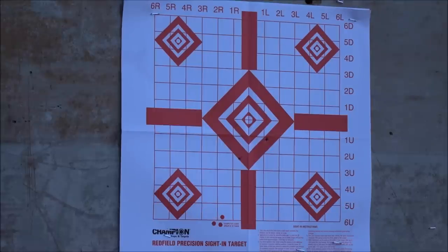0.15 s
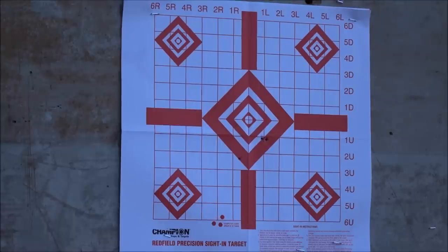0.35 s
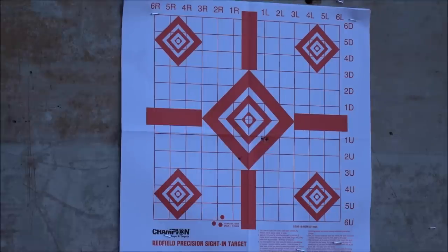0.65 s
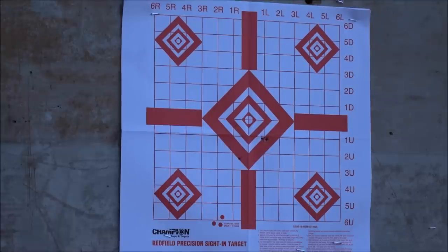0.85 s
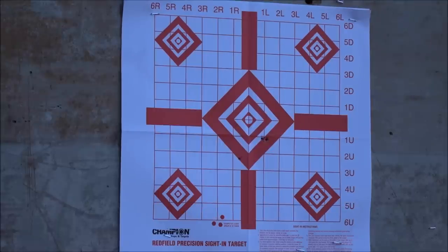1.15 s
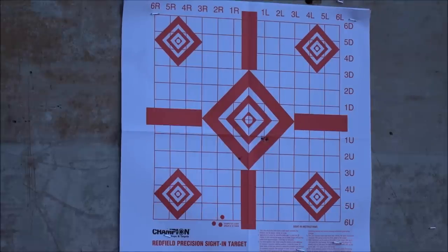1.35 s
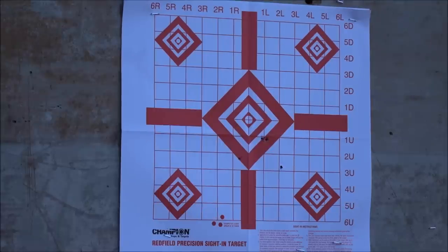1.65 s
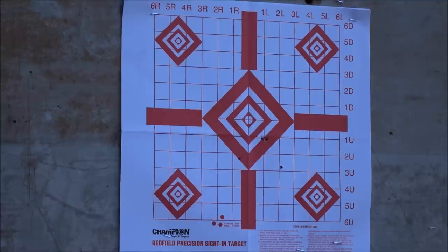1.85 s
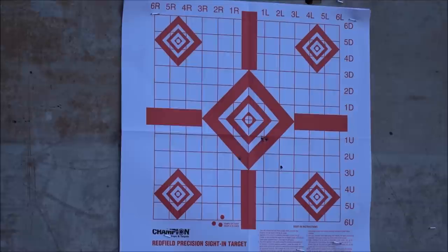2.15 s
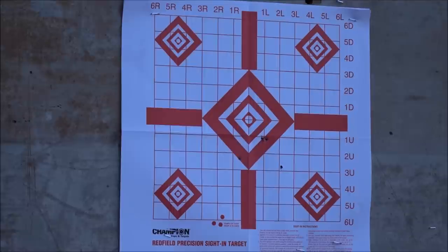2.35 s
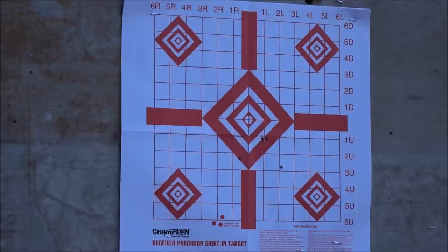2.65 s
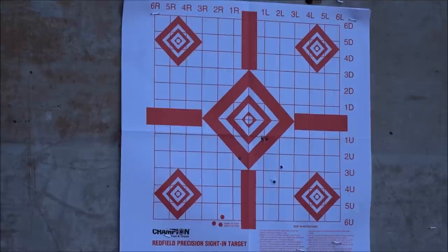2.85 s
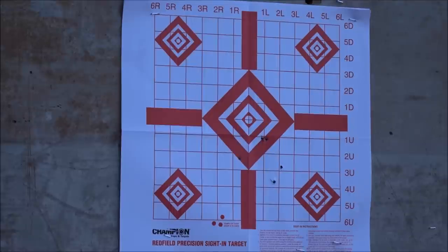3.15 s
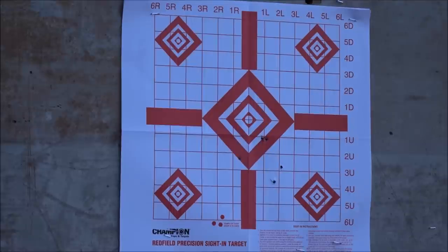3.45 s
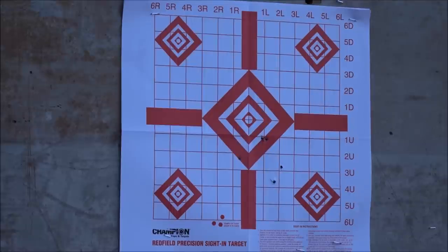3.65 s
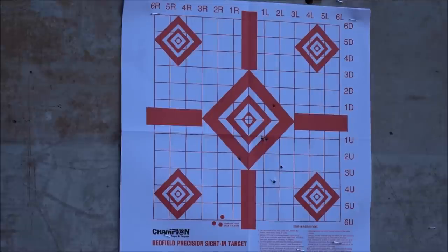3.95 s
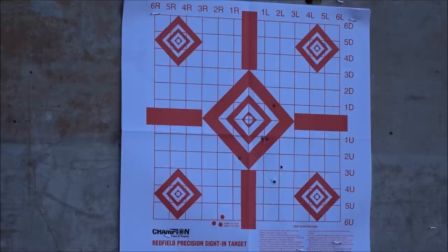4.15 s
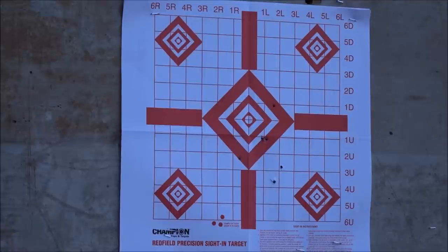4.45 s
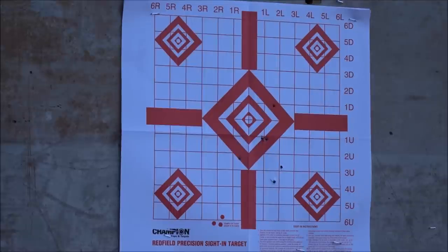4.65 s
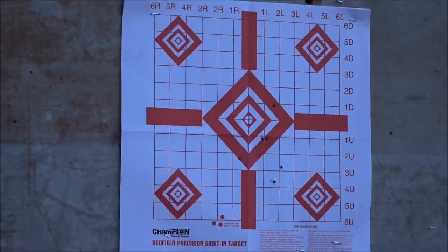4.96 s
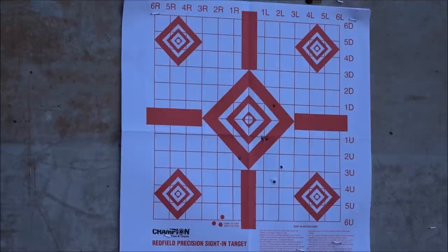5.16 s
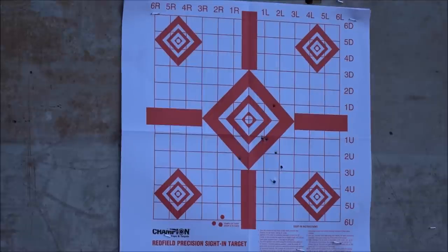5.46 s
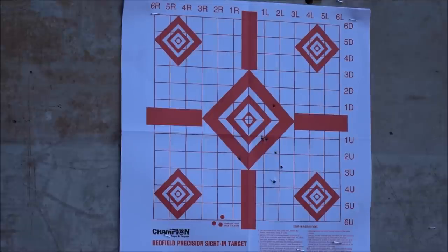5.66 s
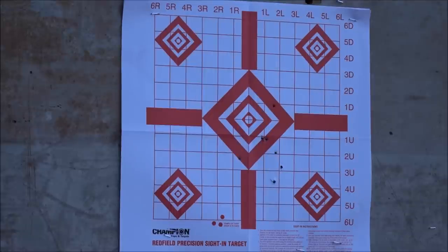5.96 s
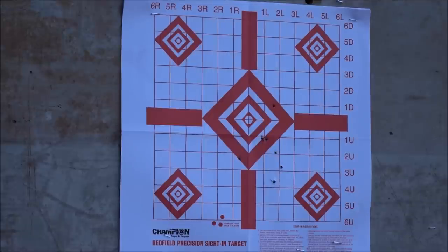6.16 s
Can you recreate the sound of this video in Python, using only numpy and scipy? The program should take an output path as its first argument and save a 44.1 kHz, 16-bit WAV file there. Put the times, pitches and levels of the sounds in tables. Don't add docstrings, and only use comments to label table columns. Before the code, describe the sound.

Six distant air rifle shots, each a clicking pop, then a pellet hiss and sharp slap on a target board, echoing through a humming outdoor yard.

```python
import sys
import numpy as np
from scipy import signal
from scipy.fft import rfft, irfft, next_fast_len
from scipy.io import wavfile
from scipy.ndimage import uniform_filter1d

SR = 44100
rng = np.random.default_rng(int(sys.argv[2]) if len(sys.argv) > 2 else 0)


def ratio_of_db(decibels):
    return 10 ** (np.asarray(decibels, float) / 20)


def transcribe(signal):
    frames = np.atleast_2d(signal).T
    limited = np.clip(frames, -1, 1)
    pcm = np.round(limited * 32767).astype(np.int16)
    wavfile.write(sys.argv[1], SR, pcm)


N = 277389
T = np.arange(N) / SR
SIDE = np.array([[1], [-1]])

# start_s, peak_db, barrel_ring_hz, first_knock_db
POPS = [(.2157, -18, 2870, -10), (1.5442, -18.5, 2700, -8), (2.702, -18.5, 3110, -.5),
        (3.8672, -17.5, 2900, -10), (5.143, -18.5, 2700, -8), (6.055, -18, 3170, -2)]
# start_s, peak_db, ring_hz, brightness_db_per_octave, fly_by_db
SLAPS = [(0.3666, -13, 4000, -0.6, -29.5), (1.7046, -14, 4470, 1.15, -27), (2.8839, -14.5, 3190, 0.75, -28),
         (4.017, -14, 3060, 0.33, -30), (5.3001, -14, 4670, 0.03, -28), (6.2336, -15, 2460, 1, -28)]
CHANGES = [1.09, 2.356, 3.49, 4.762, 5.795]


def band(x, hz, width_hz, order=2):
    low_hz = max(hz - width_hz / 2, 10)
    high_hz = min(hz + width_hz / 2, .45 * SR)
    return signal.sosfilt(signal.butter(order, [low_hz, high_hz], "band", fs=SR, output="sos"), x)


def unit(x):
    return x / np.sqrt(np.mean(x ** 2))


def pan(db):
    return ratio_of_db(np.array([db / 2, -db / 2]))


def add(out, x, s):
    start = int(s * SR)
    later = [int(change * SR) for change in CHANGES if change > s]
    end = min([N, start + x.shape[1]] + later)
    out[:, start:end] += x[:, :end - start]


def walk(rate_hz):
    hold = int(SR / rate_hz)
    steps = np.repeat(rng.standard_normal(N // hold + 1), hold)
    return 1.2 * uniform_filter1d(uniform_filter1d(steps, hold), hold)[:N]


def lumpy(size, hold, smooth):
    steps = rng.standard_normal(size // hold + 1).repeat(hold)[:size]
    return uniform_filter1d(steps, smooth)


def split(x, centres_hz):
    size = next_fast_len(x.shape[-1])
    spectrum = rfft(x, size)
    bins_hz = np.fft.rfftfreq(size, 1 / SR)
    place = np.interp(np.log(bins_hz + 1), np.log(centres_hz), np.arange(len(centres_hz)))
    for k, hz in enumerate(centres_hz):
        share = np.cos(np.pi / 2 * np.clip(place - k, -1, 1)) ** 2
        yield hz, irfft(spectrum * share, size)[..., :x.shape[-1]]


def per_take(table):
    row = np.searchsorted(np.transpose(table)[0][1:], T)
    start, *columns = np.array(table)[row].T
    return T - start, *columns


def ring(modes, ring_hz, jitter):
    t = T[:1024]
    y = 0
    for (ratio, db, t60), shift in zip(modes, jitter):
        hz = min(ratio * ring_hz * (1 + shift), 15000)
        y = y + ratio_of_db(db - 60 * t / t60) * np.sin(2 * np.pi * hz * t)
    y = y * np.minimum(t / .0003, 1)
    return y / np.abs(y).max()


def spray(size, grain_db):
    sizes = np.minimum(rng.exponential(size=(2, size // 8 + 1)), 3.5)
    grains = ratio_of_db(grain_db * sizes).repeat(8, axis=1)[:, :size]
    return unit(rng.standard_normal((2, size)) * grains)


def scatter(profile, colour, same, grain_db, wide_hz, tilt_db=0):
    delay, db, side_db = np.transpose(profile)
    t = delay[0] + T[:same.shape[1]]
    lows = signal.butter(4, 1300, fs=SR, output="sos")
    fresh = spray(len(t), grain_db)
    echoes = fresh + signal.sosfiltfilt(lows, same - fresh)
    hz_at, tone_db, loss_db = np.transpose(colour)
    centres_hz = hz_at[0] * 2 ** np.arange(0, np.log2(17000 / hz_at[0]), .5)
    out = 0
    for hz, (mid, side) in split(echoes, centres_hz):
        gain_db = np.interp(np.log(hz), np.log(hz_at), tone_db) - 10 * np.log10(hz / SR)
        gain_db = gain_db + tilt_db * np.log2(hz / 3000)
        gain_db = gain_db + (.7 + 4.5 * np.clip(t, 0, .5)) * lumpy(len(t), 500, 400)
        gain_db = gain_db - 9 * np.exp(-(t / 0.0094) ** 2) * (hz > 7000)
        gain_db = gain_db - t * np.interp(np.log(hz), np.log(hz_at), loss_db)
        width = np.clip((hz / wide_hz) ** 0.67, .3, 1) * min(1, (9000 / hz) ** .6)
        out = out + ratio_of_db(gain_db) * (mid + width * side * SIDE)
    return out * ratio_of_db(np.interp(t, delay, db) - 11) * pan(np.interp(t, delay, side_db))


def buzz(resonances):
    total = 0
    for hz, width_hz, db in resonances:
        wings = unit(band(rng.standard_normal((2, N)), hz, width_hz))
        total = total + ratio_of_db(db + 0.79 * walk(3.8) + 1.5 * walk(60)) * wings
    return unit(total)


def air():
    # pitch_hz, level_db_per_hz
    air_colour = [(15, -22), (25, -17), (43, -20.5), (70, -9.5), (102, -8), (217, -18.5), (463, -26),
                  (962, -18.5), (1130, -19), (1400, -21.5), (2160, -22.5), (3160, -30.5), (5730, -43),
                  (9320, -59.5), (16000, -63.5)]
    hz_at, db_at = np.transpose(air_colour)
    total = 0
    for hz, (mid, side) in split(rng.standard_normal((2, N)), 18 * 2 ** np.arange(0, 10, .5)):
        db = np.interp(np.log(hz), np.log(hz_at), db_at) + 2.6 * walk(7.8)
        total = total + ratio_of_db(db) * (mid + np.clip(hz / 2000, .14, 1) * side * SIDE)
    return total / np.std(band(total[0], 1400, 2300))


def yard():
    # start_s, air_db, air_drift_db_per_s, near_insects_db, far_insects_db
    surroundings = [(0, -59.5, -0.5, -72.5, -95), (1.09, -61.5, 3, -72, -94.5),
                    (2.37, -60.5, 3, -81.5, -81), (3.49, -58, -0.1, -87, -69.5),
                    (4.78, -61, 5.5, -100, -100), (5.8, -54, 2.5, -100, -100)]
    # pitch_hz, width_hz, level_db
    near_insects = [(8400, 350, -3.5), (9230, 390, 2), (9840, 400, -7), (9300, 2050, -1.5)]
    # pitch_hz, width_hz, level_db
    far_insects = [(7750, 300, -5.5), (8100, 250, -5), (8700, 300, -6), (9170, 340, 0.5)]
    since, air_db, drift_db, near_db, far_db = per_take(surroundings)
    rustle_s = 2.39
    rustle_db = np.where(T > rustle_s, -234 * (T - rustle_s), -100)
    near_db = np.maximum(near_db, -62 + rustle_db)
    far_db = np.maximum(far_db, -70.5 + rustle_db)
    hiss_db = np.maximum(-81.5, -66 + rustle_db)
    hiss = unit(band(rng.standard_normal((2, N)), 11000, 11000))
    tyres = unit(band(rng.standard_normal(N), 1345, 451.5))
    tyres = (T < 0.34) * ratio_of_db(-60.5 + 2.1 * walk(5)) * tyres
    insects = ratio_of_db(near_db) * buzz(near_insects) + ratio_of_db(far_db) * buzz(far_insects)
    return tyres + ratio_of_db(air_db + drift_db * since) * air() + insects + ratio_of_db(hiss_db) * hiss


def drone(hz, db, wobble_db, swell_db):
    turns = np.cumsum(hz * (1 + .012 * walk(14))) / SR
    level_db = db + wobble_db * walk(28) + swell_db * walk(7)
    return np.sqrt(2) * ratio_of_db(level_db) * np.sin(2 * np.pi * turns)


def duck_db():
    dip_db, dip_at_s, dip_s = -10.5, .035, 0.08
    sag_db, recover_s = -5.5, 1
    since = T - np.transpose(SLAPS)[0][:, None]
    ends = [min([change for change in CHANGES if change > s] + [N / SR]) for s, *_ in SLAPS]
    sag = (since > 0) * (T < np.array(ends)[:, None]) * np.exp(-np.abs(since) / recover_s)
    dip = np.exp(-((since - dip_at_s) / dip_s) ** 2)
    return (dip_db * dip + sag_db * sag).sum(axis=0)


def engines():
    # start_s, firing_hz, glide_hz_per_s, first_line_db, second_line_db
    firing = [(0, 51.8, 0.5, -60.5, -58.5), (1.09, 52.1, 0, -59.5, -64), (2.37, 52.0, 1, -59.5, -60),
              (3.49, 52.64, 0, -53.5, -55.5), (4.78, 51.77, -1.44, -58.5, -49), (5.8, 49.1, 8, -57, -51)]
    # start_s, end_s, pitch_hz, level_db
    machines = [(0, 1.0, 139.8, -70), (1.08, 1.3, 119.4, -58.5), (1.318, 2.36, 121, -65),
                (2.391, 3.481, 144, -63), (3.0, 3.49, 85.7, -66), (3.488, 4.76, 121.7, -69.5),
                (3.49, 4.202, 169.3, -68), (4.791, 6.281, 149.8, -63), (5.801, 6.286, 123.4, -62.5)]
    since, hz, glide, low_db, high_db = per_take(firing)
    hz = hz + glide * since
    out = drone(hz, low_db, wobble_db=2.0, swell_db=1.0)
    out = out + drone(2 * hz, high_db, wobble_db=3.0, swell_db=0.5)
    out = out * ratio_of_db(uniform_filter1d(duck_db(), 400))
    for start, end, hz, db in machines:
        on_db = np.interp(T, [start - .02, start, end, end + .02], [-100, db, db, -100])
        out = out + drone(hz, on_db, wobble_db=4.0, swell_db=-1.1)
    return out


def small_sounds():
    # start_s, length_s, from_hz, to_hz, level_db
    chirps = [
        (2.335, .02, 4800, 4600, -74),
        (3.75, .04, 5300, 4800, -77),
        (4.81, .045, 5300, 3200, -71),
        (4.878, .022, 6100, 4200, -72),
        (4.898, .025, 5700, 3600, -72),
        (4.915, .025, 5700, 4200, -74),
        (5.036, .034, 6100, 3600, -70),
        (5.063, .02, 5500, 3800, -71),
        (5.08, .03, 5200, 3600, -73),
    ]
    # start_s, peak_db
    ticks = [
        (3.4617, -34),
        (5.883, -47),
    ]
    out = np.zeros((2, N))
    for s, length, from_hz, to_hz, db in chirps:
        u = T[:int(length * SR)] / length
        turns = np.cumsum(from_hz + (to_hz - from_hz) * u) / SR
        tone = np.sin(2 * np.pi * turns) * np.sin(np.pi * u)
        leaves = rng.standard_normal((2, 1600)) * np.exp(-T[:1600] / .014) * .075
        blurred = signal.fftconvolve(leaves, tone[None])
        add(out, ratio_of_db(db) * (blurred + .6 * np.pad(tone, (0, 1599))), s)
    u = T[:64] / .00009 - 4
    snap = (u ** 2 - 1) * np.exp(-u ** 2 / 2)
    for s, db in ticks:
        add(out, ratio_of_db(db) * np.outer(pan(2.8), snap), s)
    return out


def rifle():
    # delay_s, level_db, left_minus_right_db
    pop_parts = [
        (-.0056, -16, 0),
        (.0002, 1.5, -4),
        (.008, -18, 2),
        (.0146, -9, 3),
        (.024, -16, 2),
        (.0372, -11, -4),
        (.049, -17, 0),
        (.062, -18, 0),
        (.074, -21, 0),
    ]
    # ratio_to_ring, level_db, t60_s
    pop_modes = [(.42, -11.5, 0.0095), (.75, -10, 0.0025), (1, 13, 0.003), (1.35, 1.5, 0.001),
                 (2.05, -5, 0.0031), (3.2, -17.5, 0.0026), (4.6, -13, 0.0016)]
    # delay_s, level_db, left_minus_right_db
    pop_echo = [(-.006, -36, -7.5), (.004, -12, 0), (.04, -14, -2), (.08, -18.5, 2.5), (.2, -24.5, -16),
                (0.299, -31.5, -4.5)]
    # pitch_hz, level_db, loss_db_per_s
    pop_colour = [(68, -45.5, 53.5), (165, -7, 53.5), (410, -27.5, 22.5), (990, -12.5, 2), (2040, -9, 1),
                  (3150, -1, 42.5), (4470, -8, -31.5), (7000, -11.5, -33.5), (9800, -12, -39.5),
                  (15070, -24.5, -38)]
    out = np.zeros((2, N))
    same = spray(int(.3 * SR), 0.87)
    for s, db, ring_hz, first_db in POPS:
        for delay, part_db, side_db in pop_parts:
            for lag, knock_db in ((0, first_db), (.0015, 0)):
                knock = ring(pop_modes, ring_hz, 0.018 * rng.standard_normal(len(pop_modes)))
                add(out, ratio_of_db(db + part_db + knock_db) * np.outer(pan(side_db), knock), s + delay + lag)
        echoes = scatter(pop_echo, pop_colour, same, grain_db=1.0, wide_hz=4000)
        barrel = ratio_of_db(5 + .8 * first_db) * band(echoes, ring_hz, 220, order=1)
        add(out, ratio_of_db(db) * (echoes + barrel), s + pop_echo[0][0])
    return out


def pellet():
    # pitch_hz, level_db
    wake_colour = [(1500, -17), (4000, -16), (7000, -4.5), (10000, -4.5), (13000, 4.5), (16000, -5),
                   (21000, -17.5)]
    out = np.zeros((2, N))
    t = T[:int(.2 * SR)] - .15
    hz_at, db_at = np.transpose(wake_colour)
    shift = 1 - 0.15 * np.exp(-((t - .003) / 0.0066) ** 2)
    for (s, _, _, tilt_db, hiss_db), (fired_s, *_) in zip(SLAPS, POPS):
        lead = .158 * (s - fired_s)
        flutter_db = -41.5 - 3.5 * tilt_db
        near = 1 / np.sqrt(1 + (t / np.where(t < 0, .011, .008)) ** 2)
        back = ratio_of_db(-5.5) * np.exp(-((t - lead + 0.0062) / .004) ** 2)
        eddies = ratio_of_db(2.6 * lumpy(len(t), 40, 30))
        wake = 0
        for hz, part in split(spray(len(t), 2.0), np.arange(1, 13) * 1400.):
            wake = wake + ratio_of_db(np.interp(hz / shift, hz_at, db_at)) * part
        wake = unit(eddies * (wake[0] + 0.75 * wake[1] * SIDE))
        tumble = unit(uniform_filter1d(rng.standard_normal(len(t)), 150))
        hz = (400 - 220 * np.tanh((t - .002) / .014)) * (1 + 0.11 * tumble)
        flutter = np.sin(2 * np.pi * np.cumsum(hz) / SR) * np.exp(-np.abs((t - .004) / 0.01) ** 1.1)
        fade = np.clip((t + .15) / .05, 0, 1) * np.clip((lead - t) / .004, .1, 1) * (t < lead + .01)
        sweep = pan(-3 * np.exp(-(t / .015) ** 2))
        passing = ratio_of_db(hiss_db) * (near ** 1.59 + back) * wake + ratio_of_db(flutter_db) * flutter
        add(out, fade * sweep * passing, s - lead - .15)
    return out


def reflectors():
    # delay_s, depth_s, level_db, fade_db_per_s, left_minus_right_db
    surfaces = [
        (0, 0.0013, -1, 1400, 0),
        (.01, .04, -4, 167, 3),
        (0.078, .02, -6.5, 155, 1.5),
        (0.216, 0.016, -19.5, 300, -2.5),
        (0.244, 0.044, -20.5, 84, -2),
        (0.4213, 0.0022, -26, 107, 0.5),
        (0.672, 0.047, -37, 303, 2.5),
    ]
    t = np.arange(0, 1, .0005)
    delay, depth, db, fade_db, side_db = np.transpose(surfaces)[:, :, None]
    swell_db = 20 * np.minimum(t - delay, 0) / np.minimum(2.7 * depth, delay + 0.0011)
    power = ratio_of_db(db + swell_db - fade_db * np.maximum(t - delay - depth, 0)) ** 2
    total = power.sum(axis=0) + ratio_of_db(-57.5) ** 2
    return np.transpose([t, 10 * np.log10(total), (power * side_db).sum(axis=0) / total])


def board():
    # delay_s, level_db, left_minus_right_db
    slap_parts = [
        (.0006, 3, 1.5),
        (.003, -5, 3),
        (.4228, -23.5, -5),
        (.695, -37, 3),
    ]
    # ratio_to_ring, level_db, t60_s
    slap_modes = [(.3, -8, 0.0069), (.6, 2.5, 0.0072), (1, 3.5, 0.0069), (1.6, 1.5, 0.0033),
                  (2.5, -2, 0.0038), (3.4, -7.5, 0.005)]
    # delay_s, pitch_hz, level_db, length_s
    booms = [(.01, 930, -25, .007), (.009, 550, -29, .006), (.023, 605, -25, .007), (.033, 430, -25, .01),
             (.044, 365, -29, .009), (.066, 410, -31, .007), (.078, 1030, -28, .009), (.07, 198, -43, .03),
             (.1, 80, -37, .05)]
    # pitch_hz, level_db, loss_db_per_s
    slap_colour = [(76.4, -56.5, 20), (150, -40.5, 15.5), (248.5, -33.5, 29), (425.6, -20, 32.5),
                   (770, -22, 7), (1130, -10, -5), (2100, -5, -6), (3150, 0.5, 6), (4760, 0.5, 16.5),
                   (7200, -4.5, 34), (10840, -10.5, 59.5), (15500, -14.5, 98.5)]
    out = np.zeros((2, N))
    same = spray(SR, 1.6)
    t = T[:int(.3 * SR)]
    for s, db, ring_hz, tilt_db, *_ in SLAPS:
        for delay, part_db, side_db in slap_parts:
            jitter = 0.06 * rng.standard_normal(len(slap_modes))
            blow = ring(slap_modes, ring_hz * (1 - 0.76 * delay), jitter)
            blow = uniform_filter1d(blow, 1 + int(delay * 12))
            add(out, ratio_of_db(db + part_db) * np.outer(pan(side_db), blow), s + delay)
        crack = np.diff(rng.standard_normal((2, 201))) * np.exp(-t[:200] / .0005)
        add(out, ratio_of_db(db - 13) * (crack[0] + .4 * crack), s + .0004)
        answers = 0
        for delay, hz, boom_db, length in booms:
            swell = np.exp(-((t - delay) / length) ** 2)
            level = ratio_of_db(boom_db + 1.5 * rng.standard_normal())
            answers = answers + level * np.sin(2 * np.pi * hz * t) * swell
        add(out, ratio_of_db(db) * np.outer(pan(-.5), answers * np.minimum(t / 0.0015, 1)), s)
        echoes = scatter(reflectors(), slap_colour, same, grain_db=1.5, wide_hz=4500, tilt_db=tilt_db)
        add(out, ratio_of_db(db) * echoes, s + 0.00118)
    return out


def scene():
    return yard() + engines() + small_sounds() + rifle() + pellet() + board()


def roll_off(x):
    return signal.sosfilt(signal.butter(12, 16800, fs=SR, output="sos"), x)


def record(dry):
    # start_s, end_s
    silences = [
        (2.356, 2.389),
        (4.762, 4.792),
    ]
    gate = np.ones(N)
    for start, end in silences:
        gate[int(start * SR):int(end * SR)] = ratio_of_db(-48)
    ceiling = .45
    rounded = ceiling * np.tanh(dry * gate / ceiling)
    top = signal.ellip(8, .2, 60, 15950, fs=SR, output="sos")
    return roll_off(signal.sosfilt(top, rounded))


dry = scene()
out = record(dry)
transcribe(out)
```